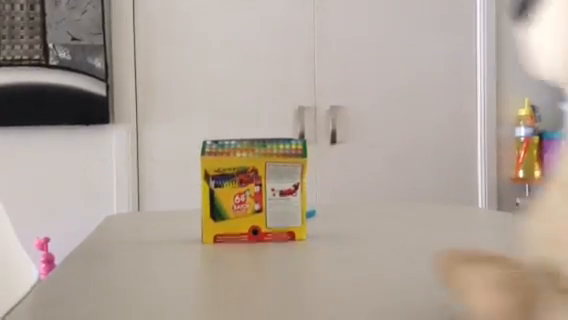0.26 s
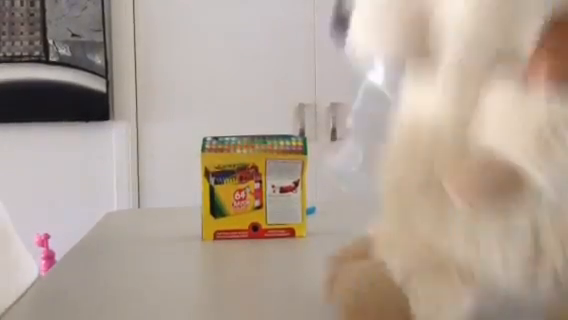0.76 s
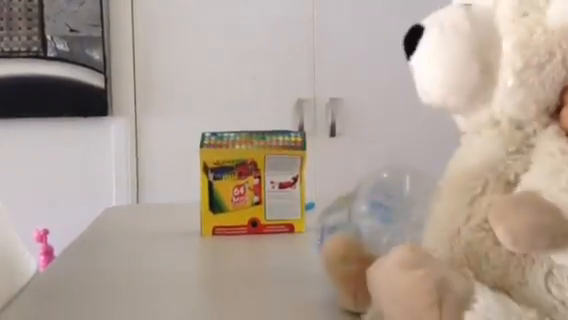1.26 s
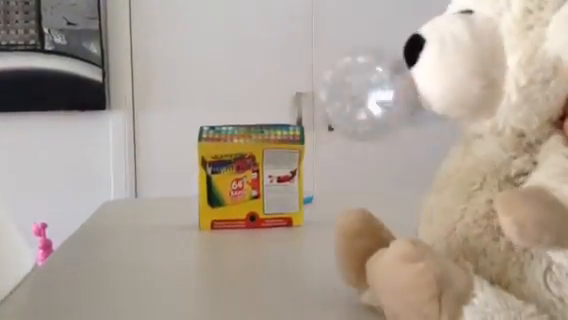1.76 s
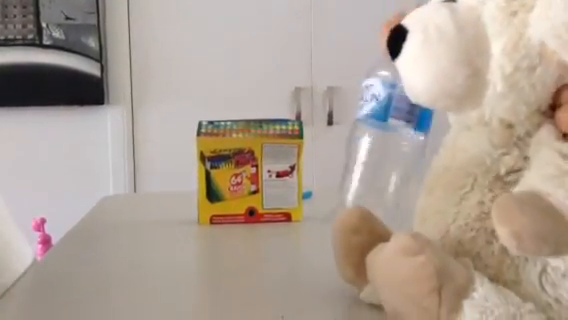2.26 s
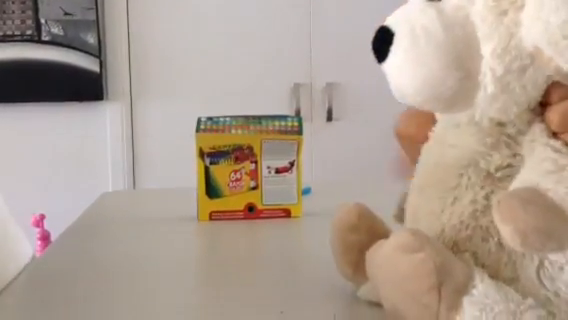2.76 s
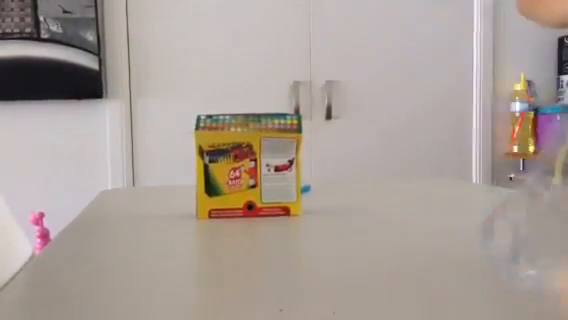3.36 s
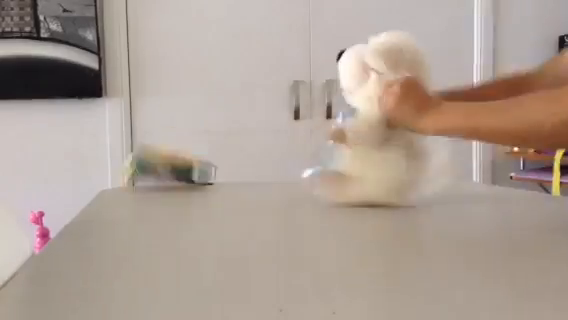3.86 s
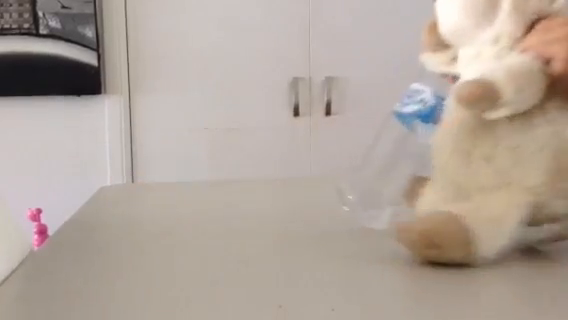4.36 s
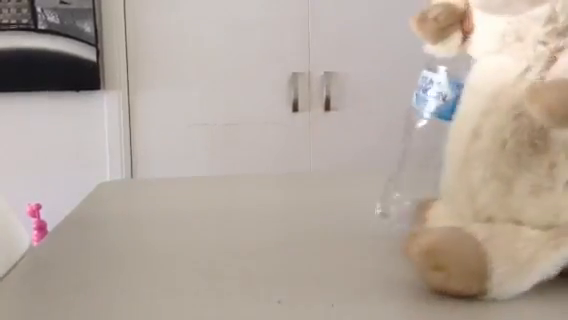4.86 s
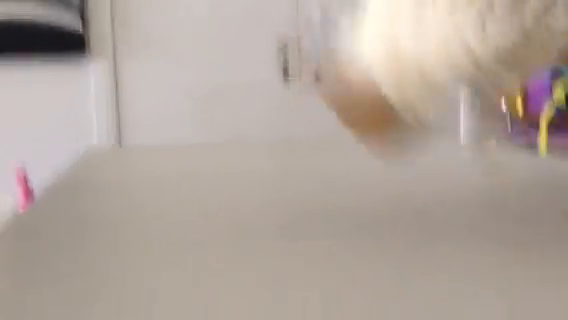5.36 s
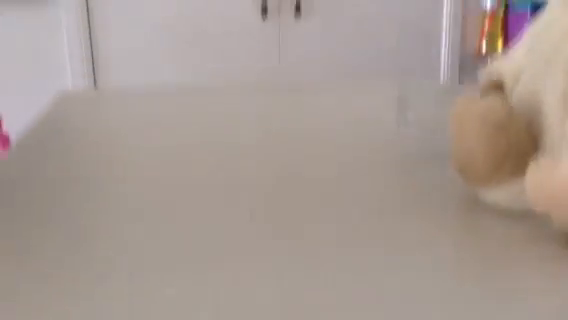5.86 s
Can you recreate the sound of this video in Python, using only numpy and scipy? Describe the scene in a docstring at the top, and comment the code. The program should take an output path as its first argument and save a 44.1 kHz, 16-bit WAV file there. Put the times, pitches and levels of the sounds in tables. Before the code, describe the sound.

A plastic bottle bounces with hollow bangs on a folding table, a plush toy rubs and shudders, and a box of crayons spills clattering onto the floor.

```python
"""A plush toy hisses and shudders over a folding table, and toy and bottle bump on it, in a small, bare room,
close to the microphone. A plastic bottle is tossed twice and bounces with hollow bangs; dragged, it gives
one hollow note. In between, a box of crayons is swept off the table and its contents clatter on the floor.
Blows are filtered noise bursts and ringing modes, rubbing and clatter are crowds of random tiny contacts,
and random decaying tails make the room."""
import sys
import numpy as np
from scipy import signal
from scipy.fft import rfft, irfft, next_fast_len
from scipy.io import wavfile
from scipy.ndimage import map_coordinates

SR = 44100
rng = np.random.default_rng(int(sys.argv[2]) if len(sys.argv) > 2 else 0)


def file_out(sig):
    """Save sig as 16-bit WAV at sys.argv[1]."""
    # one column per channel
    cols = np.atleast_2d(sig).T
    # limit, then scale
    lim = np.clip(cols, -1, 1)
    pcm = np.round(lim * 32767).astype(np.int16)
    wavfile.write(sys.argv[1], SR, pcm)


N = 270333  # length of the scene (samples)
T = np.arange(SR) / SR  # time after a blow (s)
TOP_HZ = 15500  # upper band limit

# Modes of the bottle's thin wall. Each row: frequency in Hz, level in dB, t60 in seconds.
WALL_MODES = [(656, 9, 0.15), (930, -16, 0.81), (1010, 2, 0.28), (1054, 0, 0.41), (1220, -0.5, 0.58),
              (1314, 6, 0.15), (1530, 7, 0.084), (1600, 1, 0.27), (1670, -2, 0.6), (1915, 3, 0.092),
              (2000, -6, .45), (1970, -16, 0.17), (2376, -6, 0.36), (2610, -9.5, 0.3), (2670, -15, 0.81)]


def bumps():
    """Dull blows with a woody click; the spot that is struck favours one short note and one slower, low boom."""
    # Bumps of bottle and toy on the table. Each row: start in seconds, level in dB, bass in dB,
    # brightness in dB per octave, ringing note in Hz, note level in dB, low boom in Hz.
    bump_rows = [(0.237, -26.5, -7.5, -1, 342, -5.5, 174), (.262, -38, -6, -15, 479, -2, 269),
                 (.506, -23, -1, 5.5, 362, -7.5, 133), (1.296, -43, -14, 5, 597, 9, 170),
                 (1.523, -33.5, 6.5, 9.5, 648, -7.5, 168), (2.139, -25.5, -0.5, 5.5, 773, -7, 188.6),
                 (2.257, -43.5, 9, 8, 405, -8, 198), (2.444, -35, -1.5, 8, 410, -8, 130),
                 (2.604, -28.5, 2, 7, 228, 1.5, 183), (3.421, -26.5, -11.5, 6.5, 388, 0, 129),
                 (5.42, -36.5, 5, 9.5, 279, -2, 250), (5.469, -23, -10, -1.5, 435, -3, 167.4),
                 (5.638, -12, -9.5, 7, 653, -13, 262), (5.648, -11, -7, -8, 346, -7.5, 264),
                 (5.678, -25.5, 6.5, 1, 301, -1, 176), (5.916, -18, 4, 8, 367, -21, 176.2)]
    # Spectrum of a dull blow. Each row: frequency in Hz, relative level in dB.
    thud_spectrum = [(30, -70), (95, -20), (128, 4), (200, 4.5), (400, 3.5), (700, -2.5), (1050, -10.5),
                     (1400, -22.5), (2500, -37.5), (5000, -45), (15000, -73)]
    thud_t60, note_t60, boom_t60 = 0.15, 0.11, 0.29  # s
    boom_db, boom_per_bass = -7, 0.83  # dB; dB per dB of the blow's bass
    click_db, click_hz, click_t60 = -20, 1360, 0.042  # dB at neutral brightness, Hz, s
    click_per_brightness = 0.32  # harder contact clicks more (dB per dB/octave)
    plastic_db, plastic_t60 = -19, 0.33  # extra damping on top of the wall's own (dB, s)
    out = np.zeros(N)
    for s, db, bass_db, tilt_db, hz, note_db, boom_hz in bump_rows:
        thud = amp(-2.5) * blow(thud_spectrum, bass_db, tilt_db, thud_t60, wet_db=-2.5)
        ring = amp(note_db) * punch(note(hz, note_t60, attack=0.0033))
        boom = punch(note(boom_hz, boom_t60, attack=0.0049))
        boom *= amp(boom_db + boom_per_bass * bass_db)
        click = snap(click_hz, click_t60, q=3.3)
        click *= amp(click_db + click_per_brightness * tilt_db)
        # the damped plastic rings along
        plastic = punch(ringing(WALL_MODES, attack=0.00092) * fade(plastic_t60))
        add(out, s, amp(db) * (thud + ring + boom + click + amp(plastic_db) * plastic))
    return out


def plush():
    """Fur catches and slips on the table top, and its fibres hiss."""
    # Strokes over the table. Each row: firmest pressure in seconds, rise in seconds,
    # release in seconds, shudder in dB, fur hiss in dB.
    strokes = [(.05, 0.73, 0.77, -50, -49), (.27, 0.15, .3, -59, -43.5), (.66, 0.13, 0.041, -33, -61),
               (.96, 0.21, 0.089, -40.5, -45.5), (3.22, 0.092, 0.12, -29.5, -46),
               (3.488, 0.085, 0.1, -25.5, -40), (3.72, 0.23, 0.31, -53, -24.5),
               (4.13, 0.55, .35, -31.5, -56), (4.319, 0.12, 0.21, -26, -52), (4.70, 0.12, 0.15, -32, -41),
               (5.089, 0.46, 0.083, -37.5, -52), (5.46, 0.27, .12, -41, -50),
               (5.57, 0.44, 0.69, -50, -44.5), (6.08, 0.18, 0.64, -51, -47.5)]
    # Spectrum of the shuddering fur. Each row: frequency in Hz, relative level in dB.
    fur_spectrum = [(60, -61), (140, -5.5), (330, 2.5), (600, 1.5), (900, -2), (1400, -11.5), (3000, -24.5),
                    (12000, -62)]
    # Spectrum of the rubbing fibres. Each row: frequency in Hz, relative level in dB.
    fibre_spectrum = [(60, -60), (500, -11), (2000, 8.5), (5000, 8.5), (9000, 4.5), (15500, 4)]
    shudder_db = together(db + stroke(s, rise_s, release_s) for s, rise_s, release_s, db, _ in strokes)
    hiss_db = together(db + stroke(s, rise_s, release_s) for s, rise_s, release_s, _, db in strokes)
    uneven_db = 3.3 * wobble(50)
    rub = tinted(grains(rate=1500, spread_db=1.5) * amp(shudder_db + uneven_db), fur_spectrum)
    hiss = tinted(grains(rate=5000, spread_db=4.5) * amp(hiss_db), fibre_spectrum)
    return in_room(rub, wet_db=-5.5) + hiss


def stroke(s, rise_s, release_s):
    """Level (dB) of one stroke: pressure builds and lets go."""
    range_db = 24  # gained over the rise, lost over the release
    t = clock() - s
    return range_db * np.minimum(t / rise_s, -t / release_s)


def bottle():
    """The thin wall cracks and rings, and the table booms under it."""
    # The bottle lands and bounces. Each row: start in seconds, level in dB, bass in dB,
    # brightness in dB per octave, t60 in seconds, crack in dB, table ring in dB, wall ring in dB.
    landings = [(0.9714, -13, -3, 2, 0.032, -12.5, 0, -5), (.983, -17.5, 0.5, 2.5, 0.035, -32, -12, -12),
                (1.034, -22.5, -6, 3, 0.54, -15, -17, -2), (1.0807, -13.5, -2, 1, 0.069, -18.5, -3, -14.5),
                (5.7621, -10.5, -2, 1.5, 0.12, -29, -4, -11.5), (5.79, -14.5, 9.5, 4, 0.41, -21, -8, -22)]
    # Spectrum of the bottle wall. Each row: frequency in Hz, relative level in dB.
    shell_spectrum = [(30, -14), (95, -23.5), (135, 2), (220, 7), (400, 9), (800, 3), (1500, -5),
                      (2200, -9.5), (4000, -20), (6000, -25.5), (9000, -37), (15000, -51)]
    # Modes of the table top. Each row: frequency in Hz, level in dB, t60 in seconds.
    table_modes = [(127.6, -9.5, 0.7), (180.6, -1.5, 0.64), (208.5, 10.5, 0.36), (262, -26, .4),
                   (312.3, 11.5, 0.28), (378, 0.5, 0.65), (426, -7, 0.66), (535, -34, 0.2),
                   (610, -16, 0.28), (760, -17, 0.41)]
    out = np.zeros(N)
    for s, db, bass_db, tilt_db, t60, crack_db, table_db, wall_db in landings:
        table = amp(table_db) * ringing(table_modes, attack=0.0011)
        wall = amp(wall_db) * ringing(WALL_MODES, attack=0.0022)
        bang = blow(shell_spectrum, bass_db, tilt_db, t60, wet_db=2.5)
        contact = amp(crack_db) * crack(corner_hz=2580, t60=0.0099)
        add(out, s, amp(db) * (bang + table + wall + contact))
    return out


def hum():
    """Dragging keeps one hollow note of the bottle going; then it rings out."""
    # Partials of the hollow note. Each row: multiple of the note's frequency, level in dB.
    partials = [(1, 0), (2, -16), (3, -22)]
    start_s, length_s, attack_s, t60 = 3.42, .08, .005, .18  # s
    hum_db, hum_hz, waver_db = -23, 384, 2.5
    ring_out = np.exp(-np.log(1000) * np.maximum(T - length_s, 0) / t60)
    level = (1 - np.exp(-T / attack_s)) * ring_out
    phase = 2 * np.pi * hum_hz * T + 0.61 * wobble(85)[:SR]
    tone = unit(sum(amp(db) * np.sin(k * phase) for k, db in partials))
    out = np.zeros(N)
    add(out, start_s, amp(hum_db) * level * tone)
    return out * amp(waver_db * wobble(60))


def crackles():
    """The thin plastic gives faint, sparse crackles while it is held."""
    # Spells of handling the bottle. Each row: start in seconds, end in seconds.
    spells = [(.8, 0.87), (1.28, 1.55), (2.07, 2.12), (3.08, 3.35), (5.29, 5.9)]
    crackle_db = -55.5
    held = sum((clock() > start) & (clock() < end) for start, end in spells)
    level_db = np.where(held, crackle_db, -np.inf)
    dry_crackle = clatter(level_db, rate=70, hz=2000, spread=.7, cycles=3, spread_db=3)
    return in_room(dry_crackle, wet_db=-3)


def box():
    """The cardboard box is hit, tumbles and lands."""
    # Blows on the crayon box. Each row: start in seconds, level in dB, bass in dB,
    # brightness in dB per octave, t60 in seconds, crack in dB.
    box_rows = [(3.613, -21.5, 3, 0, 0.1, -9), (3.733, -17.5, -6, -4, 0.028, -12),
                (3.757, -19.5, -0.5, 3.5, 0.11, -28), (3.932, -20, 9.5, 3.5, 0.17, -31),
                (4.213, -20.5, -1, 4.5, 0.19, -20), (4.34, -20, -1, 2, 0.8, -32),
                (4.439, -17, -42, 7, 0.075, -47)]
    # Spectrum of the cardboard. Each row: frequency in Hz, relative level in dB.
    card_spectrum = [(50, -32), (100, -13), (170, 12), (450, 8), (1000, 4), (1700, -0.5), (2600, -3.5),
                     (5200, -12), (9000, -20.5), (15000, -37)]
    out = np.zeros(N)
    for s, db, bass_db, tilt_db, t60, crack_db in box_rows:
        body = blow(card_spectrum, bass_db, tilt_db, t60, wet_db=1.5)
        contact = amp(crack_db) * crack(corner_hz=2000, t60=0.05)
        add(out, s, amp(db) * (body + contact))
    return out


def crayons():
    """Dozens of sticks knock on box and floor and clink together."""
    # Tumbling handfuls. Each row: start in seconds, time to the thickest moment in seconds,
    # knocking in dB, clinking in dB.
    handfuls = [(3.62, 0.13, -21, -24), (3.80, 0.053, -19.5, -27.5), (3.931, 0.01, -21, -30),
                (4.206, 0.02, -21.5, -24.5), (4.328, 0.13, -15.5, -16), (4.678, 0.011, -30.5, -26.5)]
    # Crayons against box and floor. Each row: frequency in Hz, relative level in dB.
    knock_spectrum = [(30, -51), (70, -38), (110, -14), (170, -8), (280, -1), (480, -0.5), (680, 5),
                      (950, 1.5), (1250, 3), (1900, 3.5), (3000, -1.5), (6000, -31)]
    # Crayon on crayon. Each row: frequency in Hz, relative level in dB.
    clink_spectrum = [(60, -79), (1200, -31), (2500, -5.5), (3500, -2), (4300, -7.5), (5100, -3),
                      (6400, -12.5), (7300, -7.5), (9500, -13), (12000, -13), (15500, -18)]
    knock_fall, clink_fall = 131, 158  # settling (dB per s)
    knock_db = together(db + tumble(s, swell_s, knock_fall) for s, swell_s, db, _ in handfuls)
    clink_db = together(db + tumble(s, swell_s, clink_fall) for s, swell_s, _, db in handfuls)
    knocks = clatter(knock_db, rate=850, hz=800, spread=.9, cycles=2, spread_db=3.5)
    snaps = clatter(clink_db, rate=900, hz=5000, spread=.45, cycles=2, spread_db=4.5)
    pings = clatter(clink_db - 9, rate=320, hz=5200, spread=.08, cycles=22, spread_db=3.5)
    knocking = in_room(tinted(knocks, knock_spectrum), wet_db=0.5)
    clinking = in_room(tinted(snaps, clink_spectrum) + pings, wet_db=0)
    return knocking + clinking


def tumble(s, swell_s, fall_db_per_s):
    """Level (dB) of one handful: it starts at once, thickens, then settles."""
    swell_db = 11.5  # growth from the first contact
    t = clock() - s - swell_s
    shape = np.minimum(swell_db * t / swell_s, -fall_db_per_s * t)
    return np.where(clock() < s, -np.inf, shape)


def ticks():
    """Each sharp contact of plastic or crayons excites one broad resonance."""
    # Each row: start in seconds, level in dB, pitch in Hz, t60 in seconds.
    contacts = [(.817, -47, 1500, 0.047), (.818, -49, 4600, 0.055), (0.831, -47, 5700, .05),
                (.942, -48, 1890, 0.04), (1.081, -34, 5340, 0.014), (1.082, -26.5, 2730, 0.078),
                (1.299, -39, 1460, 0.026), (1.361, -45.5, 4830, .03), (1.52, -44, 5440, 0.04),
                (2.082, -50, 2420, 0.23), (3.173, -42, 790, 0.091), (3.192, -32, 730, 0.097),
                (3.615, -22.5, 487, 0.025), (3.733, -18, 1660, .026), (3.934, -27.5, 740, .05),
                (4.104, -32.5, 395, 0.21), (4.226, -23, 288, .07), (4.343, -25.5, 2900, .09),
                (4.443, -19, 1250, .18), (4.689, -27.5, 5450, 0.2), (4.711, -26.5, 4960, 0.19),
                (5.393, -43.5, 1780, 0.14), (5.469, -33, 790, 0.18), (5.541, -45.5, 3630, 0.05),
                (5.638, -20, 965, 0.056), (5.761, -17.5, 1520, 0.027), (5.913, -38.5, 8250, 0.017)]
    out = np.zeros(N)
    for s, db, hz, t60 in contacts:
        add(out, s, amp(db) * snap(hz, t60, q=5.7))
    return in_room(out, wet_db=-6.0)


def air():
    """Room tone and hiss: coloured noise at a nearly steady level."""
    # Spectrum of room tone and hiss. Each row: frequency in Hz, relative level in dB.
    air_spectrum = [(20, -62), (60, -37), (100, -26), (140, -2.5), (260, -4), (308, 6.5), (380, -6),
                    (660, -4), (1000, -10), (2100, -16), (3300, -10), (5100, -6), (6500, -10.5),
                    (11000, -14.5), (15200, -15.5)]
    air_db = -47
    hiss = unit(colour(rng.standard_normal(N), lambda hz: along(air_spectrum, hz)))
    return hiss * amp(air_db + 0.17 * wobble(8.2))


def tail():
    """A new diffuse room answer of energy 1: noise that decays at its own pace in each band."""
    # Decay of the room. Each row: frequency in Hz, t60 in seconds.
    room_t60 = [(100, 0.46), (300, 0.41), (1000, 0.37), (2500, 0.49), (5000, 0.53), (9000, 0.49),
                (15000, 0.47)]
    hz, t, z = signal.stft(rng.standard_normal(SR), SR, nperseg=256)
    decay = np.exp(-np.log(1000) * t / along(room_t60, hz)[:, None])
    x = signal.istft(z * decay, SR, nperseg=256)[1][:SR]
    x = x * (1 - np.exp(-T / 0.0063))  # the answer builds up over some milliseconds
    return x / np.linalg.norm(x)


def in_room(x, wet_db):
    """Direct sound plus the room's answer, drawn anew every twelfth of a second."""
    wet, step = np.zeros(N), SR // 12
    for i in range(0, N, step):
        piece = x[i:i + step]
        if np.abs(piece).max() > 1e-3:  # near-silent pieces stay dry
            add(wet, i / SR, signal.fftconvolve(piece, tail()))
    return (x + amp(wet_db) * wet) / np.hypot(1, amp(wet_db))


def blow(spectrum, bass_db, tilt_db, t60, wet_db):
    """Crowded, damped modes of a struck body, as decaying noise plus the room; harder contact is brighter."""
    def shape(hz):
        bass = bass_db / (1 + (hz / 280) ** 4)
        brightness = tilt_db * np.log2(np.maximum(hz, 500) / 500)
        return along(spectrum, hz) + bass + brightness

    body = rng.standard_normal(SR) * fade(t60)
    body /= np.linalg.norm(body)
    return punch(colour(body + amp(wet_db) * tail(), shape))


def crack(corner_hz, t60):
    """The first contact: a short, broad noise snap, weaker above its corner."""
    burst = rng.standard_normal(SR) * fade(t60)
    return punch(colour(burst, lambda hz: -10 * np.log10(1 + (hz / corner_hz) ** 2)))


def snap(hz, t60, q):
    """A short noise burst in one broad resonance."""
    def resonance(f):
        return -10 * np.log10(1 + (q * (f / hz - hz / (f + 1))) ** 2)

    return punch(colour(rng.standard_normal(SR) * fade(t60), resonance))


def note(hz, t60, attack):
    """One mode that swells and rings out."""
    return np.sin(2 * np.pi * hz * T) * fade(t60) * (1 - np.exp(-T / attack))


def ringing(modes, attack):
    """All modes of a body, at slightly new strengths and random signs for each blow."""
    total = np.zeros(SR)
    for hz, db, t60 in modes:
        strength = amp(db + rng.normal(0, 1)) * rng.choice([-1, 1])
        total += strength * note(hz, t60, attack)
    return punch(total)


def grains(rate, spread_db):
    """Random tiny contacts of uneven size, rate a second, rms 1."""
    hit = rng.random(N) < rate / SR
    sign = rng.choice([-1, 1], N)
    size = amp(spread_db * np.clip(rng.standard_normal(N), -2, 2))
    return unit(hit * sign * size)


def clatter(level_db, rate, hz, spread, cycles, spread_db):
    """Random contacts, each ringing briefly at its own pitch, around the given overall level."""
    t = T[:SR // 50]
    start = np.flatnonzero((rng.random(N) < rate / SR) & (level_db > -100))
    pitch, size, phase = np.clip(rng.standard_normal((len(start), 3)), -2, 2).T[:, :, None]
    f = np.minimum(hz * np.exp(spread * pitch), TOP_HZ)
    rings = np.sin(2 * np.pi * (f * t + phase)) * np.exp(-f * t / cycles)
    rings *= unit(amp(spread_db * size)) / np.linalg.norm(rings, axis=1, keepdims=True)
    rings *= amp(level_db[start, None]) * np.sqrt(SR / rate)  # sparser contacts are each stronger
    where = start[:, None] + np.arange(len(t))
    return np.bincount(where.ravel(), rings.ravel(), N + len(t))[:N]


def amp(db):
    """Amplitude factor of a level in dB."""
    return 10 ** (np.asarray(db) / 20)


def unit(x):
    """Scaled to rms 1."""
    return x / np.sqrt(np.mean(x ** 2) + 1e-20)


def punch(x):
    """Scaled to rms 1 over the first 40 ms."""
    return x / np.sqrt(np.mean(x[:SR // 25] ** 2) + 1e-20)


def fade(t60):
    """Exponential decay by 60 dB in t60 seconds."""
    return np.exp(-np.log(1000) * T / t60)


def clock():
    """The time of every sample (s)."""
    return np.arange(N) / SR


def wobble(rate):
    """A smooth random curve, rate knots a second."""
    return map_coordinates(rng.standard_normal(int(N * rate / SR) + 4), [np.arange(N) * rate / SR])


def together(levels_db):
    """The level of overlapping sounds: their powers add."""
    return 10 * np.log10(sum(amp(db) ** 2 for db in levels_db) + 1e-12)


def along(points, hz):
    """Interpolates (Hz, value) points on a log frequency axis."""
    f, v = np.transpose(points)
    return np.interp(np.log(hz + 1), np.log(f + 1), v)


def colour(x, level_db):
    """Causal minimum-phase filter with the given dB as a function of frequency."""
    m = 2 * next_fast_len(len(x) // 2 + 4096, real=True)
    cep = irfft(np.log(amp(level_db(np.fft.rfftfreq(m, 1 / SR)))))
    cep[1:m // 2] *= 2  # folding the cepstrum forward makes the filter causal
    cep[m // 2 + 1:] = 0
    return irfft(rfft(x, m) * np.exp(rfft(cep)))[:len(x)]


def tinted(x, spectrum):
    """x given a spectrum, at unchanged power."""
    return unit(colour(x, lambda hz: along(spectrum, hz))) * np.std(x)


def add(track, s, sound):
    """Mix a sound in at s seconds."""
    part = track[round(s * SR):][:len(sound)]
    part += sound[:len(part)]


def scene():
    """All sources at the table and on the floor, over the room tone, on one channel."""
    bumped = bumps() + plush()
    plastic = bottle() + hum() + crackles()
    spill = box() + crayons()
    return (bumped + plastic + spill + ticks() + air())[None]


def record(dry):
    """The microphone thins the deep bass; the loudest peaks are rounded off; nothing passes the band limit."""
    x = signal.sosfilt(signal.butter(3, 72, "highpass", fs=SR, output="sos"), dry)
    x = x / (1 + np.abs(x / 1.05) ** 6) ** (1 / 6)
    m = next_fast_len(N + SR // 2)
    passed = np.fft.rfftfreq(m, 1 / SR) < TOP_HZ
    return irfft(rfft(x, m) * passed, m)[..., :N]


dry = scene()
out = record(dry)
file_out(out)
```